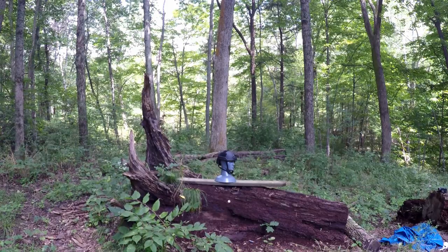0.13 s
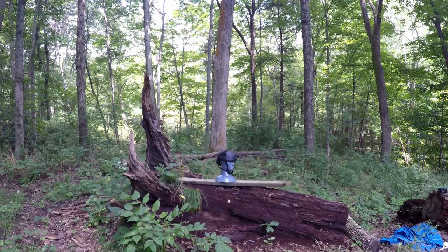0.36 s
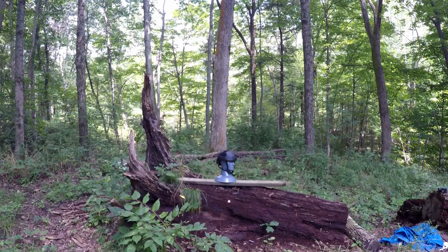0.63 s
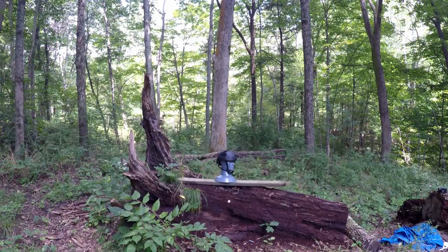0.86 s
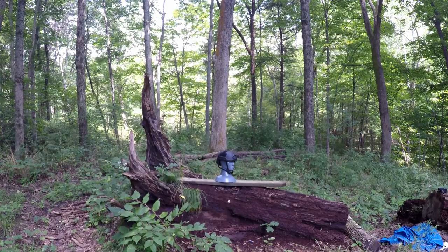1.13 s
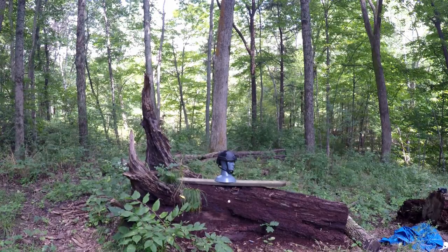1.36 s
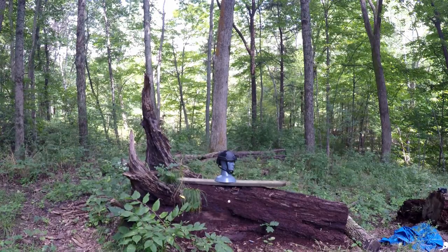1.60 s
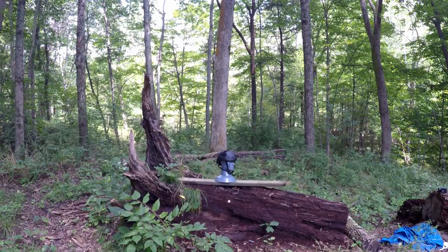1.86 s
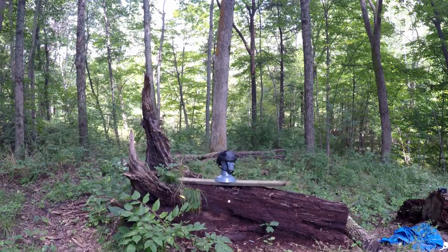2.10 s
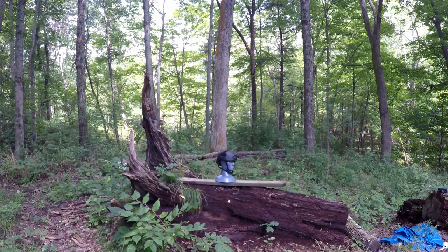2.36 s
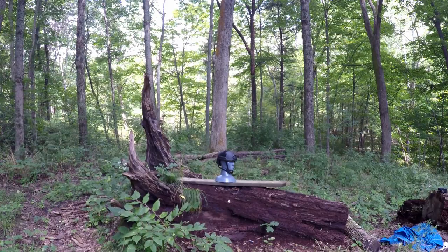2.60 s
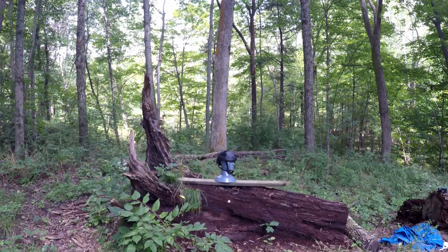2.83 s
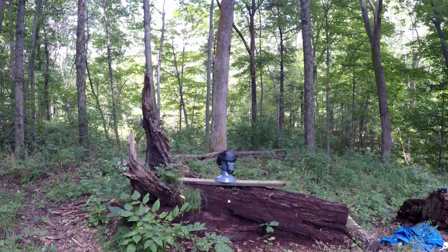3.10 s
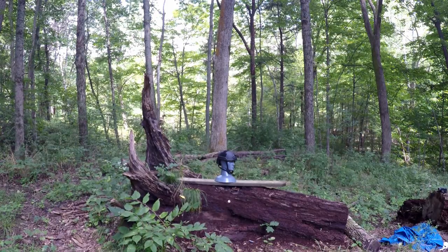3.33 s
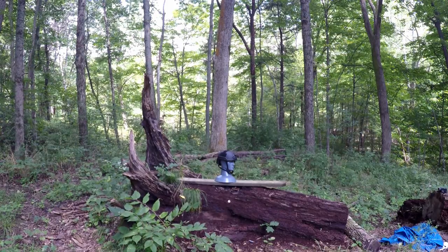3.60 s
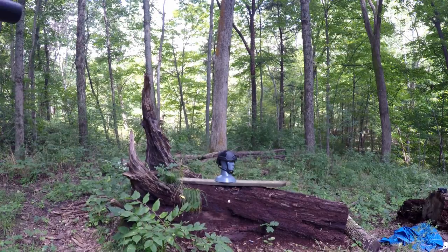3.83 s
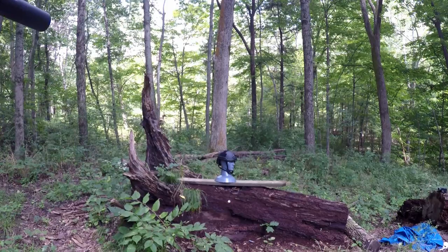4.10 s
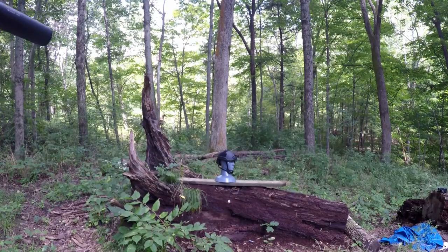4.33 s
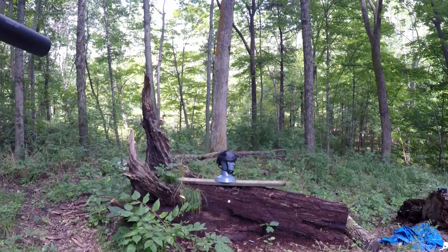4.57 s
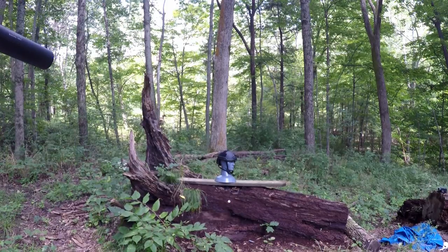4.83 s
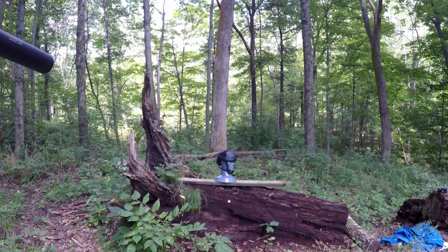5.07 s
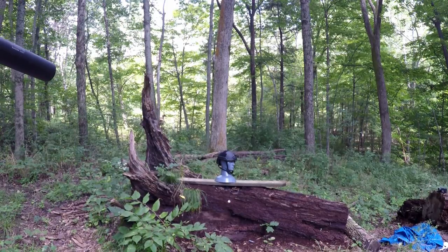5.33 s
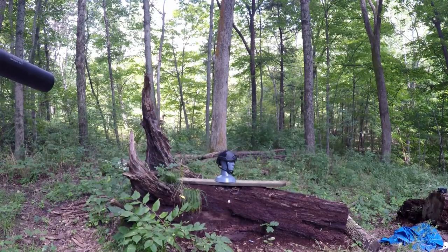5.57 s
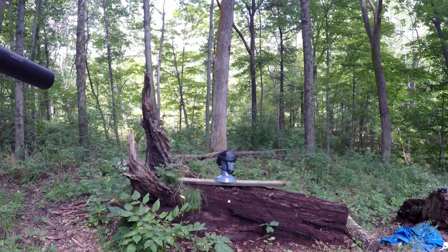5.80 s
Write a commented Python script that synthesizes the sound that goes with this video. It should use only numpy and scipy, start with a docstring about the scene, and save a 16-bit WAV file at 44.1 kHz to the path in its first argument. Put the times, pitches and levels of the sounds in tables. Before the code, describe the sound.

A handgun is loaded near the microphone, slightly left: small dull taps, a solid magazine click before one second, then a rattling slide pull and a sharp, bright steel clack near 1.7 seconds. Sparse woodland echoes follow. High buzzing insects and a faint low engine hum continue throughout, briefly turned down by automatic gain, while cloth rustles and fingers tap softly.

```python
"""In a wood full of insects a pistol is handled close to two microphone ports, nearer the left one.
The magazine snaps home, the slide is racked back and slams shut: bursts of noise ring steel resonances.
Fingers tap the grip and clothes rustle; trunks and leaves scatter the pistol's sound as sparse echoes.
Behind are the chorus and a far engine: shaped noise, throbbing singers and two wavering low tones.
Gain control turns the whole wood down when a clack is loud and lets it recover slowly."""
import sys
import numpy as np
from scipy import signal
from scipy.fft import rfft, irfft
from scipy.io import wavfile
from scipy.ndimage import uniform_filter1d, minimum_filter1d

SR = 44100
rng = np.random.default_rng(int(sys.argv[2]) if len(sys.argv) > 2 else 0)


def to_linear_factor(level_db):
    """Convert decibel levels (scalar or array-like) to linear amplitude factors."""
    exponent = np.asarray(level_db, float) / 20
    return 10 ** exponent


def store_pcm(level_fs):
    """Save levels as 16-bit WAV."""
    pcm = np.round(np.clip(level_fs, -1, 1) * 32767).astype(np.int16)
    wavfile.write(sys.argv[1], SR, np.atleast_2d(pcm).T)


N = 261954  # length in samples


def evened(x):
    """Scales to rms 1."""
    return x / np.sqrt(np.mean(x ** 2) + 1e-20)


def two_ports(db):
    """Gains of the left and right port, the left one raised and the right one lowered by db."""
    return to_linear_factor(np.array([[db], [-db]]))


def read(points, hz):
    """Reads a spectrum on a log-frequency axis."""
    f, value = np.transpose(points)
    return np.interp(np.log(hz + 1), np.log(f + 1), value)


def level(points, outside_db=-120):
    """Gain over time from rows of seconds and dB."""
    s, db = np.transpose(points)
    return to_linear_factor(np.interp(np.arange(N) / SR, s, db, outside_db, outside_db))


def strokes(rows):
    """Gain over time of movements that rise, hold and fall; their powers add."""
    edge_db = -23.5  # a stroke starts and ends this far under its full level
    power = np.zeros(N)
    for s, rise, hold, fall, db in rows:
        full, leave = s + rise, s + rise + hold
        power += level([(s, db + edge_db), (full, db), (leave, db), (leave + fall, db + edge_db)]) ** 2
    return np.sqrt(power)


def add(mix, s, sound):
    """Adds a sound at time s."""
    part = mix[..., round(s * SR):][..., :sound.shape[-1]]
    part += sound[..., :part.shape[-1]]


def resonate(x, hz, width):
    """A resonance of gain 1: shift down to 0 Hz, smooth, shift back."""
    turn = np.exp(2j * np.pi * hz * np.arange(x.shape[-1]) / SR)
    r = np.exp(-np.pi * abs(width) / SR)
    return 2 * (turn * signal.lfilter([1 - r], [1, -r], x / turn)).real


def ring(x, modes):
    """Sum of resonances; neighbours alternate in sign so that no notch falls between."""
    return sum((-1) ** k * to_linear_factor(db) * resonate(x, hz, width) for k, (hz, width, db) in enumerate(modes))


def band_noise(shape, hz, width):
    """Noise of rms 1 around one pitch, narrowed by two equal resonances in a row."""
    return evened(resonate(resonate(rng.standard_normal(shape), hz, width), hz, width))


def hiss(spectrum, patchy_db):
    """Random short-time spectra with drifting patches, most alike in both ports in the bass; rms 1."""
    # Likeness of the two ports. Each row: frequency in Hz, correlation from -1 to 1.
    port_likeness = [(60, 0.88), (120, 0.99), (240, 0.88), (480, 0.85), (950, 0.8), (1890, 0.53),
                     (3760, -0.16), (7500, -0.034), (15000, 0.018)]
    hz = np.fft.rfftfreq(1024, 1 / SR)
    a, b, c, d, patches = rng.standard_normal((N // 256 + 5, 513, 5)).T
    for axis in (0, 1):
        patches = uniform_filter1d(patches, size=10, axis=axis)
    same = np.clip(read(port_likeness, hz), -1, 1)[:, None]
    left = a + 1j * b
    right = same * left + np.sqrt(1 - same ** 2) * (c + 1j * d)
    shape = to_linear_factor(read(spectrum, hz)[:, None] + patchy_db * evened(patches))
    return evened(signal.istft(np.array([left, right]) * shape, nperseg=1024, noverlap=768)[1][:, :N])


def clacks(unlike=0.28):
    """Steel parts meet: each blow is a short dying rattle that drives slide, frame and hollow grip."""
    # Blows as the magazine goes home, the slide comes back and the slide shuts. Each row: start in
    # seconds, relative blow in dB, share of the frame in dB, share of the grip in dB.
    clack_rows = [(0.7401, 9, -9, -13.5), (0.7414, 6, -1, -11), (.7430, 4, 1.5, -10),
                  (0.7466, 5.5, -5, -12), (1.5540, -17, 2, -12), (1.5600, -6, -10, -23),
                  (1.568, -4.5, 4.5, -28), (1.57, -6, 2, -27), (1.5858, -9, -14, -28),
                  (1.5765, -16, 10, -24), (1.595, -13, -8, -27), (1.6030, -7, -14, -22),
                  (1.6093, 2, -9, -16), (1.6117, 8, -6, -15.5), (1.6146, 8, -1.5, -18),
                  (1.6187, -2, 8, -14), (1.6250, -13.5, -2, -1.5), (1.7030, -17, 2, -10),
                  (1.7197, -13, -6, -27), (1.7237, -2.5, -19, -29), (1.7276, -5, -9, -28),
                  (1.7308, -1, -4, -18), (1.7382, 20.5, -11, -37), (1.7377, 22, -3, -26),
                  (1.7433, 21, -14, -28), (1.7455, 14, 1.5, -31), (1.749, 5, 0, -19)]
    rattle_t60_s = 0.0085  # every blow dies alike
    bright, low, hollow = np.zeros((3, 2, N))
    t = np.arange(2400) / SR
    sides = two_ports(1)  # the left port is 2 dB ahead
    for s, db, low_db, grip_db in clack_rows:
        shared = rng.standard_normal(len(t))
        own = rng.standard_normal((2, len(t)))  # heard by one port only
        rattle = to_linear_factor(db - 60 * t / rattle_t60_s) * np.minimum(t / 0.0002, 1)  # rises in 0.2 ms
        strength = np.linalg.norm(rattle)
        shared *= strength / np.linalg.norm(rattle * shared)  # the blow sets the energy
        # heavy parts feel mostly the first jolt
        push = strength * (t == 0) + 0.5 * rattle * shared
        add(bright, s, sides * rattle * (shared + unlike * own))
        add(low, s, sides * (push + 0.42 * rattle * own) * to_linear_factor(low_db))
        add(hollow, s, sides * (push + 0.96 * rattle * own) * to_linear_factor(grip_db))
    return bright, low, hollow


def scrapes():
    """Magazine and slide scrape along their guides: noise whose grains slip unevenly."""
    # Scraping movements. Each row: start, rise, hold and fall in seconds, relative level in dB.
    scrape_rows = [(.65, 0.085, .01, 0.16, -33.5), (1.549, 0.0089, 0.062, 0.02, -33),
                   (1.717, 0.017, 0.021, 0.041, -25.5)]
    slips_db = 4.4 * np.minimum(rng.exponential(1, N), 4)
    grit = rng.standard_normal(N) * to_linear_factor(slips_db)
    return evened(grit) * strokes(scrape_rows)


def slam():
    """The whole pistol rings low as the slide closes: a few dying sines."""
    # Low ring. Each row: frequency in Hz, starting amplitude in dB, t60 in seconds.
    slam_modes = [(70, -10, 0.062), (155, -7.5, 0.049), (265, -16.5, 0.14), (451, -38, 0.41)]
    t = np.arange(SR // 2) / SR
    return sum(to_linear_factor(db - 60 * t / t60) * np.sin(2 * np.pi * hz * t) for hz, db, t60 in slam_modes)


def add_taps(mix):
    """Palm and fingers tap the grip: a jolt and brief noise ring a knuckle pitch and a low thump."""
    # Taps. Each row: start in seconds, peak in dB midway between the ports, pitch in Hz, width in Hz,
    # left over right in dB.
    tap_rows = [(0.037, -30.5, 303, 250, 0.5), (0.074, -36, 400, 600, -1), (0.26, -35.5, 600, 1000, -0.5),
                (0.54, -41, 700, 900, 3), (0.663, -35.5, 990, 600, 1.5), (0.682, -35, 540, 400, 3),
                (0.707, -23, 1100, 1210, 4), (0.7422, -12.5, 706, 170, 0), (0.79, -35, 563, 400, -5),
                (2.563, -28.5, 564, 330, -4), (2.619, -35.5, 498, 382, -3), (3.445, -41, 620, 250, 1),
                (3.822, -36.5, 307, 400, 1.5)]
    t = np.arange(2400) / SR
    for s, db, hz, width, pan_db in tap_rows:
        knock = (t == 0) + 0.48 * rng.standard_normal(len(t)) * to_linear_factor(-60 * t / 0.016)  # t60 16 ms
        knuckle = resonate(resonate(knock, hz, width), hz, 1.5 * width + 150)
        thump = resonate(resonate(knock, 245, 300), 235, 300)
        tap = knuckle + 0.26 * thump
        add(mix, s, to_linear_factor(db) * two_ports(pan_db / 2) * tap / abs(tap).max())


def far_port(x):
    """The pistol's sound reaches the right port late and duller."""
    lag_s, dull_hz = 0.00014, 10000
    hz = np.fft.rfftfreq(N, 1 / SR)
    shade = np.exp(-2j * np.pi * hz * lag_s) / np.sqrt(1 + (hz / dull_hz) ** 4)
    return irfft(rfft(x) * shade, N)


def pistol():
    """Blows and scrapes ring slide, frame and grip; the closing slam and the taps join them."""
    # What slide and barrel ring with. Each row: frequency in Hz, width in Hz, relative level in dB.
    slide_modes = [(3460, 2200, 1), (4160, 1290, 5.5), (5960, 670, 6.5), (6800, 1410, 5), (7520, 670, 7),
                   (9220, 1630, 1), (9600, 500, 6.5), (10400, 1760, -6.5), (13100, 950, -14),
                   (13700, 800, -22)]
    # What the frame rings with. Each row: frequency in Hz, width in Hz, relative level in dB.
    frame_modes = [(1190, 470, -7), (1800, 186, 2), (2290, 650, -3), (3260, 610, 0)]
    # What the hollow grip rings with. Each row: frequency in Hz, width in Hz, relative level in dB.
    grip_modes = [(332, 195, -0.5), (500, 173, 4.5), (714, 420, -4)]
    bright, low, hollow = clacks()
    stroke = scrapes()
    bright += to_linear_factor(9.0) * stroke
    low += to_linear_factor(10.5) * stroke
    hollow += to_linear_factor(-1.5) * stroke
    body = to_linear_factor(1.5) * ring(low, frame_modes) + to_linear_factor(4.5) * ring(hollow, grip_modes)
    out = to_linear_factor(1) * ring(bright, slide_modes) + body * two_ports(-1.5)
    add(out, 1.739, slam())  # seconds
    add_taps(out)
    return np.array([out[0], far_port(out[1])])


def trees(x):
    """Trunks and leaves scatter sparse echoes of random sign, other ones for each port, dulled."""
    # Scatter: level in dB under the direct sound, t60 in seconds.
    scatter = (-30, 0.53)
    db, t60 = scatter
    dull_hz = 5400
    length = SR // 2
    taps = np.zeros((2, length))
    # one echo at random in every 20 samples
    at = np.arange(400, length - 20, 20) + rng.integers(0, 20, (2, (length - 401) // 20))
    np.put_along_axis(taps, at, rng.choice([-1., 1.], at.shape), 1)
    taps = resonate(taps * to_linear_factor(-60 * np.arange(length) / SR / t60), 0, 2 * dull_hz)
    return to_linear_factor(db) * signal.fftconvolve(x, taps / np.linalg.norm(taps[0]), axes=1)[:, :N]


def clothes():
    """Arms move in clothes: soft noise with a grainy, uneven level."""
    # Arm movements. Each row: start, rise, hold and fall in seconds, relative level in dB.
    rustle_rows = [(2.2, 0.43, .3, 0.11, -52.5), (2.75, 0.28, .08, .16, -48), (3.45, 0.099, .15, .1, -52.5),
                   (3.6, 0.15, 0.4, 0.29, -48.5)]
    # Colour of cloth. Each row: frequency in Hz, relative density in dB per Hz.
    cloth_colour = [(100, -64), (300, 5), (700, -4.5), (1200, -1.5), (2000, -8.5), (4000, -3.5),
                    (12000, -50)]
    grain_db = 1.4 * evened(uniform_filter1d(rng.standard_normal(N), size=300))
    return hiss(cloth_colour, patchy_db=1.0) * to_linear_factor(grain_db) * strokes(rustle_rows)


def insects():
    """Chorus as patchy noise over a low wash; single singers are bands of noise that throb."""
    # Chorus and wash. Each row: frequency in Hz, relative density in dB per Hz.
    wood_colour = [(12, -20), (30, -8.5), (60, -9.5), (130, -17.5), (300, -22.5), (1100, -32.5),
                   (1900, -34.5), (2600, -22), (4200, -9), (6900, 0.5), (9000, -6.5), (10900, -26.5),
                   (13800, -32), (15400, -50)]
    # Singers that stand out. Each row: pitch in Hz, width in Hz, level before the swell in dB,
    # throbs a second.
    singer_rows = [(6920, 1130, -34.5, 18), (7810, 580, -37, 15), (6960, 61, -46.5, 1.36)]
    # Slow swell of the chorus. Each row: time in seconds, gain in dB.
    chorus_swell = [(0, -1.5), (1.5, -0.5), (3, 0.5), (6, -0.5)]
    t = np.arange(N) / SR
    out = to_linear_factor(-25.5) * hiss(wood_colour, patchy_db=0.82)
    for hz, width, db, throb in singer_rows:
        pulse = 1 + 0.64 * np.sin(2 * np.pi * (throb * t + rng.random()))
        out += to_linear_factor(db) * pulse * band_noise((2, N), hz, width)
    return out * level(chorus_swell)


def engine():
    """Far engine: wavering sines follow the firing rate under a fuzzy upper drone of narrow noise."""
    # Fuzzy upper drone. Each row: pitch in Hz, width in Hz, level before the swell in dB.
    drone_bands = [(108.6, 17.8, -51), (214.8, 8.6, -62)]
    # Swell of the upper drone. Each row: time in seconds, gain in dB.
    drone_swell = [(0, 1), (3.2, -1.5), (3.8, 0), (4.4, 4.5), (4.7, -3), (6, -0.5)]
    # Course of the engine. Each row: time in seconds, firing rate in Hz.
    firing_rate = [(0, 48.48), (1.6, 47.6), (1.85, 49.3), (3.1, 49.4), (3.3, 47.3), (6, 47.6)]
    # Low tones. Each row: multiple of the firing rate, level in dB about which it wavers.
    order_rows = [(.5, -48), (1, -46.5)]
    out = np.zeros(N)
    for hz, width, db in drone_bands:
        out += to_linear_factor(db) * level(drone_swell) * band_noise(N, hz, width)
    turns = np.cumsum(np.interp(np.arange(N) / SR, *np.transpose(firing_rate))) / SR
    for order, db in order_rows:
        waver_db = 3.9 * evened(resonate(rng.standard_normal(N), 0, 6.2))
        tone = np.sin(2 * np.pi * (order * turns + rng.random()))
        out += np.sqrt(2) * to_linear_factor(db + waver_db) * tone
    return out


def wood():
    """Insects and engine, a little stronger in the left port."""
    return (insects() + engine()) * two_ports(0.6)


def scene():
    """All sources at the two ports."""
    near = pistol()
    return wood() + near + trees(near) + clothes()


def band_limit(x):
    """A steep low-pass at the top of the band."""
    return signal.sosfilt(signal.butter(12, 15550, fs=SR, output="sos"), x)


def record(dry):
    """Gain control follows the louder port, holds, then recovers; a quick limiter catches the peaks."""
    knee_db, slope = -8, 1.0
    quick_s, hold_s, fall_db = 0.036, 0.044, 15  # smoothing and hold in seconds, recovery in dB a second
    r = np.exp(-1 / (quick_s * SR))
    power = signal.lfilter([1 - r], [1, -r], (dry ** 2).max(0))
    power_db = 10 * np.log10(power + 1e-12)
    span = 2 * round(hold_s * SR / 2) + 1
    # the highest level of the last moments
    held_db = -minimum_filter1d(-power_db, span, origin=span // 2, mode="nearest")
    fall = np.arange(N) * fall_db / SR
    held_db = np.maximum.accumulate(held_db + fall) - fall
    duck_db = slope * 10 * np.log10(1 + to_linear_factor(2 * (held_db - knee_db)))  # soft knee
    ducked = dry / to_linear_factor(duck_db)
    peak = uniform_filter1d(-minimum_filter1d(-abs(ducked).max(0), size=61), size=41)
    limited = ducked / np.maximum(peak / 1.34, 1) ** 0.76
    return band_limit(np.clip(limited, -1, 1))


dry = scene()
out = record(dry)
store_pcm(out)
```